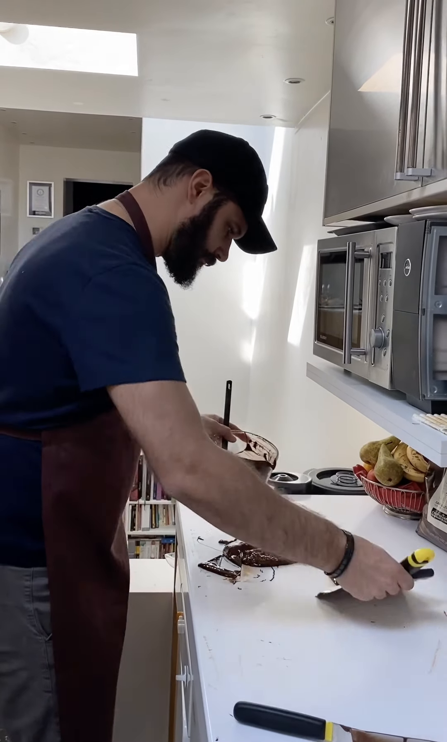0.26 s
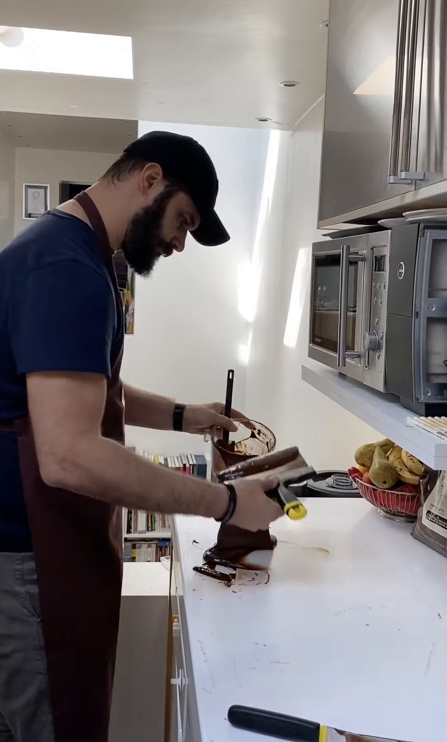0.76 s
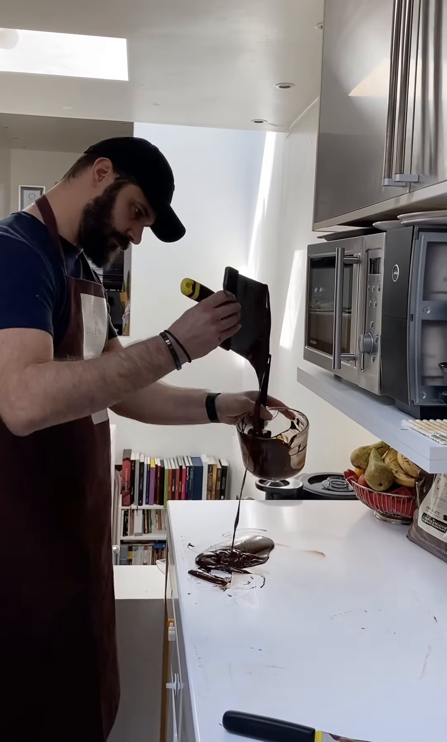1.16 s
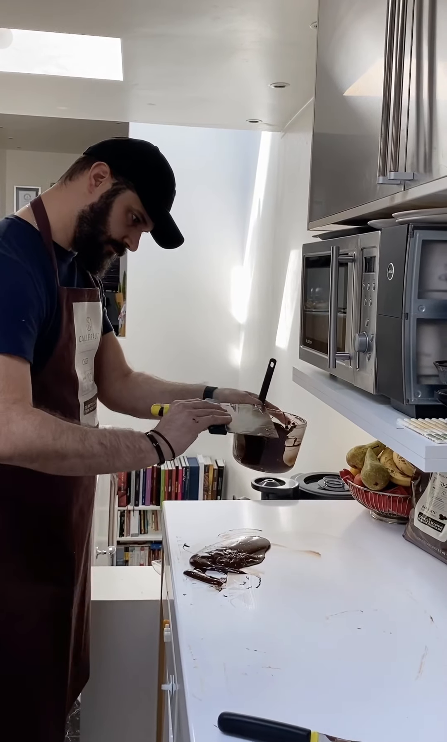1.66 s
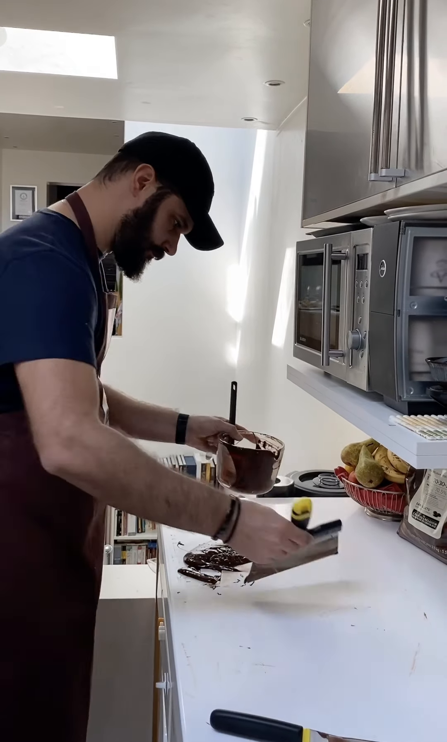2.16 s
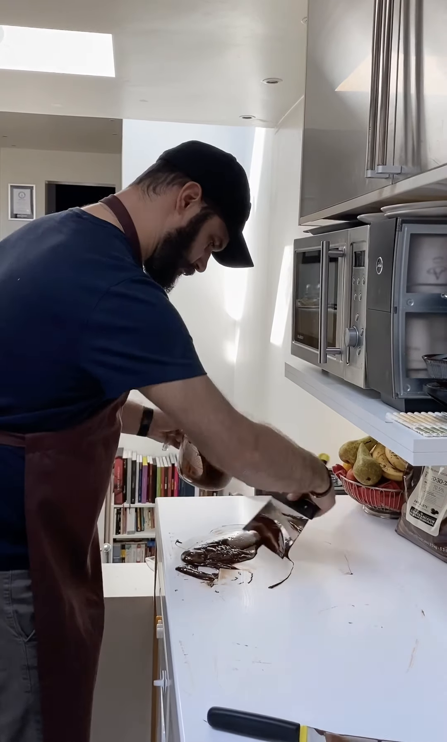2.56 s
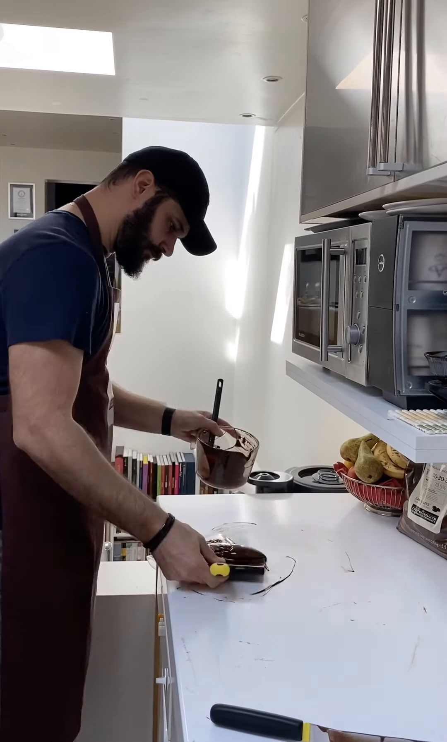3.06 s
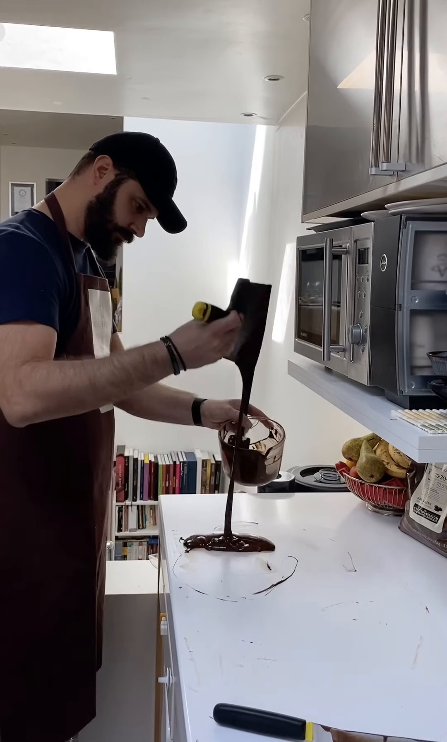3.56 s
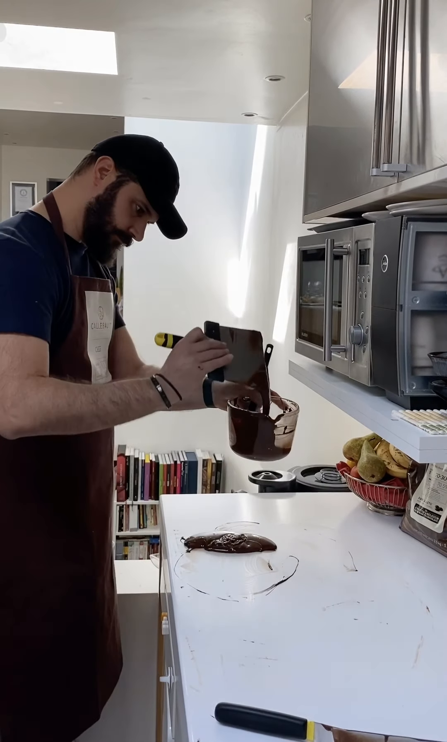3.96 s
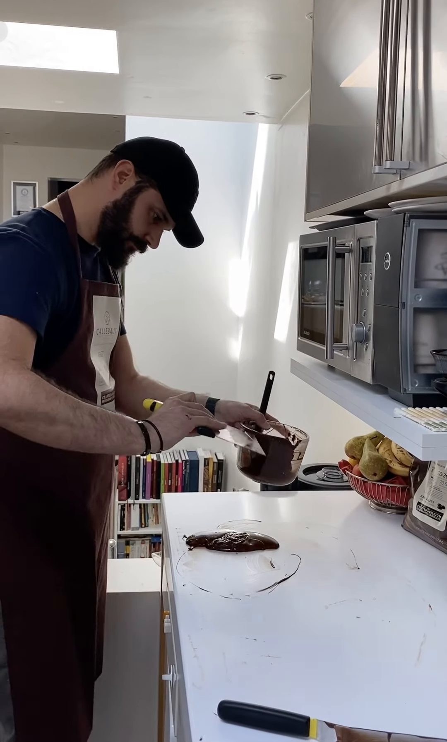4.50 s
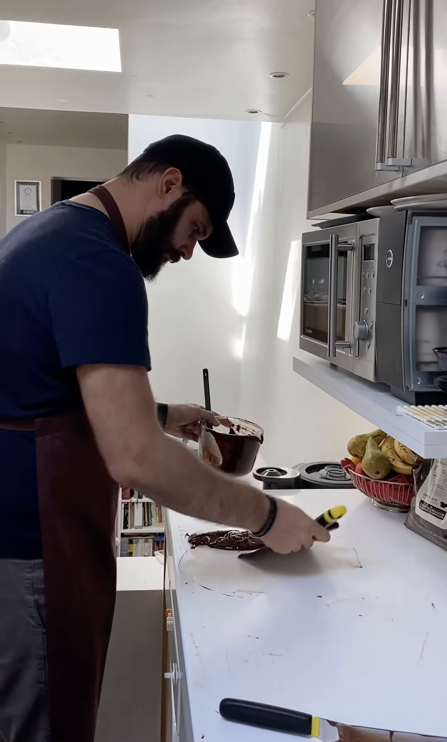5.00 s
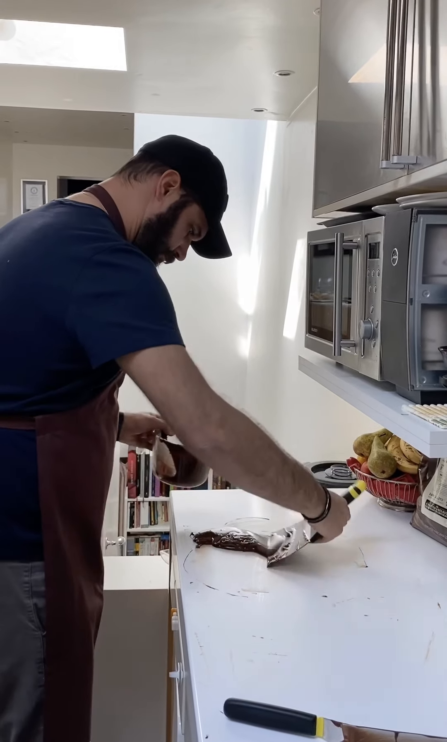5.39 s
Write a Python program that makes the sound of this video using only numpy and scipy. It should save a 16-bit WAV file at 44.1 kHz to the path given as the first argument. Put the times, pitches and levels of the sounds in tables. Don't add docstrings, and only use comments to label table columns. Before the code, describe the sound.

Close stereo sound of chocolate work in a small hard kitchen: one strong blade clack and a firm hissing scrape, a quiet pause with faint taps and a bowl wipe, a softer multiple clack with longer scraping, another pause, a quick ringing wipe, then loud rapid clacks and final short scrapes. Short bright echoes follow the blows; fridges rumble faintly below.

```python
import sys
import numpy as np
from scipy import signal
from scipy.fft import rfft, irfft
from scipy.io import wavfile
from scipy.ndimage import uniform_filter1d

SR = 44100
rng = np.random.default_rng(int(sys.argv[2]) if len(sys.argv) > 2 else 0)


def generate_wav(sig):
    pcm = np.round(np.clip(np.atleast_2d(sig).T, -1, 1) * 32767).astype(np.int16)
    wavfile.write(sys.argv[1], SR, pcm)


def amplitude_ratio(level_db):
    exponent = np.asarray(level_db, float) / 20
    return 10 ** exponent


N = 248724
FIRM_DB = -45


def evened(x):
    return x / np.sqrt(np.mean(x ** 2) + 1e-20)


def slow_noise(window):
    return evened(uniform_filter1d(uniform_filter1d(rng.standard_normal(N), window), window))


def read(points, hz):
    f, value = np.transpose(points)
    return np.interp(np.log(hz + 1), np.log(f + 1), value)


def coloured(x, points):
    hz = np.fft.rfftfreq(x.shape[-1], 1 / SR)
    inside = (hz >= points[0][0]) & (hz <= points[-1][0])
    spectrum = rfft(x) * amplitude_ratio(read(points, hz)) * inside
    return evened(irfft(spectrum, x.shape[-1]))


def resonate(x, hz, width):
    turn = np.exp(2j * np.pi * np.cumsum(hz * np.ones(len(x))) / SR)
    r = np.exp(-np.pi * width / SR)
    return 2 * (turn * signal.lfilter([1 - r], [1, -r], x / turn)).real


def rung(x, peaks, flex):
    grip = uniform_filter1d(uniform_filter1d(rng.standard_normal((len(peaks), N)), 2500), 2500)
    swell_db = 3.7 * evened(grip)
    total = np.zeros(N)
    for (hz, width, db), swell in zip(peaks, swell_db):
        total += amplitude_ratio(db + swell) * evened(resonate(x, hz * flex, width))
    return evened(total)


def struck(modes, t, detune):
    ring = np.zeros(len(t))
    for (hz, db, t60), shift in zip(modes, detune):
        ring += amplitude_ratio(db - 60 * t / t60) * np.sin(2 * np.pi * hz * shift * t)
    return ring / abs(ring).max()


def grit(per_s, spread_db):
    size = amplitude_ratio(spread_db * np.minimum(rng.exponential(1, N), 5))
    return size * rng.standard_normal(N) * (rng.random(N) < per_s / SR)


def ports(a, b, likeness):
    same = np.clip(read(likeness, np.fft.rfftfreq(N, 1 / SR)), 0, 1)
    right = same * rfft(a) + np.sqrt(1 - same ** 2) * rfft(b)
    return np.array([a, irfft(right, N)])


# (time [s], clack level [dB], crack level [dB], counter thud level [dB], crack fall by 60 dB [s])
BLOWS = [(0.0648, -26.5, -51, -31, 0.035), (.1292, 2, -15.5, -30.5, .016), (1.419, -54, -69, -69.5, 0.025),
         (1.4435, -50, -64, -58, 0.026), (2.2457, -25.5, -36.5, -30, 0.025),
         (2.2492, -10, -24, -30.5, 0.01), (2.2526, -10.5, -27, -35, 0.02), (2.2575, -13, -36, -25, 0.011),
         (4.459, -52, -55, -53, .02), (4.7402, -19, -39, -26, 0.11), (4.7684, -2, -21, -25.5, 0.0068),
         (4.7706, -4, -22.5, -34.5, 0.019), (4.7751, -1, -19.5, -30, 0.014)]
# (pitch [Hz], level [dB], fall by 60 dB [s])
CLACK_MODES = [(780, 0.5, 0.026), (879, 10, 0.018), (1030, 3, .018), (1170, 2, 0.033), (1250, -3, .015),
               (1910, -3.5, 0.015), (2010, -2.5, 0.017), (570, -16, 0.03), (798, -22, 0.27),
               (1186, -21, .3), (1910, -21.5, .25), (3740, -27, .25)]
# (pitch [Hz], level [dB], fall by 60 dB [s])
COUNTER_MODES = [(197.6, 5.5, 0.058), (294, -1.5, 0.16), (360, -6, .1), (446.4, -2.5, .12),
                 (600, -4, 0.054)]
# (pitch [Hz], level per Hz [dB])
CRACK_COLOUR = [(1500, -14), (2200, -3), (4000, 0), (5500, -3), (7500, -5.5), (10000, -10), (13000, -13.5),
                (15700, -15), (16300, -39.5)]


def blows():
    out = np.zeros((2, N + SR))
    t = np.arange(SR // 2) / SR
    detune = 1 + 0.011 * rng.standard_normal((len(BLOWS), 12))
    hiss = coloured(rng.standard_normal((2, N + SR)), CRACK_COLOUR)
    hiss[1] = 1.05 * hiss[0] + 0.25 * hiss[1]
    for (s, clack_db, crack_db, thud_db, t60), shift in zip(BLOWS, detune):
        at = slice(round(s * SR), round(s * SR) + len(t))
        clack = amplitude_ratio(clack_db) * struck(CLACK_MODES, t, shift) * np.minimum(t / .0012, 1)
        crack = hiss[:, at] * amplitude_ratio(crack_db + 5.0 - 60 * t / max(t60, .002)) * np.minimum(t / 0.00027, 1)
        thud = amplitude_ratio(thud_db) * struck(COUNTER_MODES, t, shift) * np.minimum(t / .004, 1)
        out[:, at] += clack + crack + thud
    return out[:, :N]


# (time [s], level [dB], pitch [Hz], fall by 60 dB [s])
THUMPS = [(.068, -41, 68, 0.24), (.135, -43, 53.3, 0.73), (.135, -30.5, 162, 0.15),
          (1.443, -57.5, 369, 0.14), (1.443, -56, 654, 0.16), (2.25, -38.5, 60.6, 0.23),
          (2.25, -35.5, 169, 0.19), (2.64, -51, 456, 0.072), (2.75, -48.5, 270, 0.081),
          (2.865, -53, 720, 0.084), (3.07, -42, 52.5, 0.44), (3.08, -50.5, 114, 0.14),
          (4.46, -52, 268.4, .1), (4.528, -50.5, 337, 0.13), (4.54, -54.5, 544, 0.081),
          (4.53, -52, 744, .06), (4.532, -55, 950, .06), (4.555, -46, 200, 0.05), (4.745, -43, 83, 0.36),
          (4.775, -37, 50.6, 0.32), (4.775, -32, 164, 0.22), (5.262, -43, 414, 0.03),
          (5.265, -43.5, 253, 0.059)]


def thumps():
    out = np.zeros((2, N + SR))
    t = np.arange(SR // 2) / SR
    for s, db, hz, t60 in THUMPS:
        pair = [(hz, 0, t60), (1.36 * hz, -9, .5 * t60)]
        start = round(s * SR)
        out[:, start:start + len(t)] += amplitude_ratio(db) * struck(pair, t, [1, 1]) * np.minimum(t * hz, 1)
    return out[:, :N]


def pressure_db(rows):
    t = np.arange(0, N + 64, 64) / SR
    power = amplitude_ratio(2 * -103)
    for s, held, db, rise, fall in rows:
        slope = np.minimum((t - s) / rise, (s + held - t) / fall)
        power = power + amplitude_ratio(2 * (db + 20 * np.minimum(0, slope)))
    return np.interp(np.arange(N) / SR, t, 10 * np.log10(power))


def follows(drag_db, firm_db, slope):
    return amplitude_ratio(firm_db + slope * (drag_db - FIRM_DB))


# (pitch [Hz], level per Hz [dB])
DRAG_COLOUR = [(1500, -32.5), (2400, -5), (3500, -3), (4600, 0.5), (5800, -5.5), (7000, -9), (8500, -21.5)]
# (pitch [Hz], width [Hz], level [dB])
BLADE_MODES = [(2920, 200, -3), (3740, 160, -2.5), (4600, 250, 2.5), (5380, 190, -0.5), (5950, 410, 12.5),
               (7130, 440, -10.5)]


def edge_drag(slips, catches, flex):
    spread = slips + .45 * rng.standard_normal((2, N)) * slips.std()
    return evened(coloured(spread, DRAG_COLOUR) + 0.52 * rung(catches, BLADE_MODES, flex))


# (pitch [Hz], width [Hz], level [dB])
BODY_MODES = [(800, 40, -1.5), (930, 70, -8.5), (1180, 59, -4), (1290, 99, -15.5), (2000, 220, -3.5),
              (2070, 170, 0)]


def scraper_body(low, catches, flex):
    return evened(low + .45 * rung(catches, BODY_MODES, flex))


# (time [s], level [dB], fall by 60 dB [s])
CHATTER = [
    (.066, -38, .15),
    (.135, -25.5, .46),
    (2.26, -36, .38),
    (4.742, -40, .2),
    (4.79, -34, .62),
]
# (pitch [Hz], width [Hz], level [dB])
RATTLE_MODES = [(820, 60, -2), (920, 50, 0), (1090, 50, -2), (1178, 35, 2), (1265, 60, -2), (1370, 60, -5),
                (1845, 60, -6), (1935, 60, -6)]


def chatter(low, catches):
    t = np.arange(N) / SR
    strength, ring = np.zeros(N), np.zeros(N)
    for s, db, t60 in CHATTER:
        strength += (t > s) * amplitude_ratio(db - 60 * abs(t - s) / t60)
    for hz, width, db in RATTLE_MODES:
        ring += amplitude_ratio(db) * evened(resonate(catches, hz, width))
    return strength * evened(low + 1.8 * evened(ring))


# (pitch [Hz], level per Hz [dB])
FIZZ_COLOUR = [(6000, -14.5), (7500, -8.5), (9500, -5.5), (11500, -6), (13500, -5), (15700, -10),
               (15950, -43.5)]


def fizz(slips):
    return coloured(slips + 0.25 * rng.standard_normal((2, N)) * slips.std(), FIZZ_COLOUR)


# (full pressure at [s], held [s], drag level [dB], time to rise 20 dB [s], time to fall 20 dB [s])
SCRAPES = [(.26, .09, -37, .14, .135), (.62, .2, -78, .2, .3), (1.03, .05, -66, .22, .08),
           (1.93, .02, -70, .05, .12), (2.19, .01, -74, .05, .1), (2.27, .1, -43, .03, .45),
           (2.58, .08, -52, .3, .4), (2.8, .08, -57, .4, .15), (2.98, .07, -45, .13, .13),
           (4.1, .18, -70, .12, .12), (4.92, .05, -42.5, .25, .36), (5.31, .04, -51, .1, .2),
           (5.39, .03, -51, .1, .12), (3.35, .05, -76, .15, .2), (1.2, .02, -83, .05, .2)]
# (full pressure at [s], held [s], drag level [dB], time to rise 20 dB [s], time to fall 20 dB [s])
SMEARS = [(.07, .005, -48, .005, .04), (.13, .05, -42, .012, .15), (1.441, .06, -70, .02, .1),
          (1.575, .03, -59, .13, .1), (1.773, .03, -71, .25, .25), (2, .1, -77, .2, .4),
          (3.2, .05, -75, .1, .3), (3.76, .01, -83, .08, .03), (4.175, .01, -57, .15, .09),
          (4.3, .08, -71, .3, .3), (4.53, .03, -67, .2, .25), (4.83, .03, -42, .06, .2),
          (5.5, .02, -60, .1, .1), (5.615, .01, -45, .13, .04)]
# (level at a firm stroke [dB], gain per dB of drag [dB])
RING_LAW = [
    (-56.5, .6),
    (-56.5, .6),
]
# (level at a firm stroke [dB], gain per dB of drag [dB])
FIZZ_LAW = [
    (-45, 1.12),
    (-50, 1.3),
]
# (pitch [Hz], level per Hz [dB])
LOW_COLOUR = [(350, -12.5), (600, -7.5), (1000, 2.5), (1500, -2.5), (2200, -7.5), (3000, -19)]


def strokes():
    t = np.arange(N) / SR
    scrape_db, smear_db = pressure_db(SCRAPES), pressure_db(SMEARS)
    drag_db = 20 * np.log10(np.hypot(amplitude_ratio(scrape_db), amplitude_ratio(smear_db)))
    flex = 1 - .06 * np.minimum(amplitude_ratio(.5 * (drag_db - FIRM_DB)), 1.5)
    flex = flex * (1 + .012 * slow_noise(3000))
    slips, catches = grit(14000, 1.5), grit(6600, 2.0)
    low = coloured(slips, LOW_COLOUR)
    hum_gain = np.hypot(follows(scrape_db, *RING_LAW[0]), follows(smear_db, *RING_LAW[1]))
    fizz_gain = np.hypot(follows(scrape_db, *FIZZ_LAW[0]), follows(smear_db, *FIZZ_LAW[1]))
    layers = amplitude_ratio(drag_db) * edge_drag(slips, catches, flex)
    layers += hum_gain * scraper_body(low, catches, flex)
    layers += chatter(low, catches)
    layers += fizz_gain * fizz(slips)
    return (t > BLOWS[0][0]) * amplitude_ratio(-4.0) * layers


# (time [s], level [dB], rise [s], fall by 60 dB [s])
WIPES = [
    (1.895, -49.5, 0.021, 0.09),
    (4.457, -44, .003, .17),
]
# (pitch [Hz], level per Hz [dB])
SWIPE_COLOUR = [(800, -22), (2200, -10), (3200, -2), (5500, -1), (7500, -3), (10000, -7), (13000, -11),
                (15700, -14)]
# (pitch [Hz], width [Hz], level [dB])
RIM_MODES = [(3120, 100, -17.5), (3600, 90, -40), (4630, 150, 12), (6470, 150, -3), (7600, 240, 16.5),
             (9440, 310, 9.5)]
# (time [s], level [dB], pitch [Hz], length [s], pitch rise [share])
SQUEAKS = [(1.615, -61, 1630, 0.042, 0), (2.283, -35.5, 980, .03, .2), (2.78, -61, 1130, 0.2, .22),
           (5.29, -60, 2000, .07, 0), (4.935, -45, 4280, .06, 0), (4.94, -52.5, 3800, 0.075, 0),
           (5.52, -56, 2000, .22, 0), (5.552, -60, 2687, .16, 0), (5.552, -61.5, 997, .18, 0)]


def wipes():
    t, out = np.arange(N) / SR, np.zeros(N)
    slips = grit(9000, 1.85)
    swipe = evened(coloured(slips, SWIPE_COLOUR) + 0.72 * rung(grit(6000, 2.0), RIM_MODES, 0.96))
    for s, db, rise, t60 in WIPES:
        out += swipe * amplitude_ratio(db + np.minimum(30 * (t - s) / rise, -60 * (t - s) / t60))
    for s, db, hz, length, rise in SQUEAKS:
        done = np.clip((t - s) / length, 0, 1)
        squeak = evened(resonate(slips, hz * (1 + rise * done), 55))
        out += amplitude_ratio(db) * squeak * np.sin(np.pi * done) ** 2
    return out


# (pitch [Hz], fall by 60 dB [s])
ROOM_DECAY = [(100, .45), (400, .45), (1000, 0.14), (2800, 0.38), (7000, 0.19), (14000, 0.17)]
# (delay [s], level [dB])
EARLY = [(.0035, -21.5), (.0065, -9), (.0098, -11), (.0135, -13.5), (.0172, -10.5), (.0215, -8),
         (.0265, -17)]
# (pitch [Hz], likeness [0-1, clipped])
ROOM_LIKENESS = [(100, 4.33), (270, .95), (500, 0.6), (1000, 0.2), (2500, 0), (5000, -0.44), (9000, 0.36),
                 (14000, 1)]


def room(x):
    taps = np.zeros((2, SR))
    at = np.arange(500, SR - 20, 20) + rng.integers(0, 20, (2, (SR - 501) // 20))
    np.put_along_axis(taps, at, rng.choice([-1., 1.], at.shape), 1)
    hz, t, z = signal.stft(taps, SR, nperseg=256)
    decay = amplitude_ratio(-60 * t / read(ROOM_DECAY, hz)[:, None])
    tail = signal.istft(z * decay, SR, nperseg=256)[1]
    tail *= np.minimum(np.arange(tail.shape[1]) / SR / 0.014, 1)
    tail = amplitude_ratio(-6.5) * tail / np.linalg.norm(tail[0])
    for k, (s, db) in enumerate(EARLY):
        arrival = round(s * SR) + 9 * (k % 3) * np.arange(2)
        tail[[0, 1], arrival] += (-1) ** k * amplitude_ratio(db) / 2
    return ports(*signal.fftconvolve(x[None], tail, axes=1)[:, :N], ROOM_LIKENESS)


# (pitch [Hz], level per Hz [dB])
AIR_COLOUR = [(65, -17), (110, -9), (124, -11.5), (181, -4.5), (270, -5), (411, -11), (473, -14.5),
              (650, -17), (704, -12.5), (763, -18.5), (950, -18), (1630, -28), (2200, -19.5), (4600, -34.5),
              (13000, -50.5)]
# (pitch [Hz], level per Hz [dB])
RUMBLE_COLOUR = [(13, -56.5), (22, -21), (25, -32.5), (32, -8.5), (84, 0.5), (101, -0.5), (110, -28),
                 (114, -28.5), (130, -38.5), (170, -61), (290, -120)]
# (pitch [Hz], likeness [0-1])
FAR_LIKENESS = [(100, 0.74), (160, .9), (270, 0.57), (450, .35), (800, 0.036), (2500, .2), (6000, 0.14),
                (12000, .7)]


def kitchen():
    air = ports(*coloured(rng.standard_normal((2, N)), AIR_COLOUR), FAR_LIKENESS)
    lumps_db = 1.6 * slow_noise(2500)
    rumble = evened(coloured(rng.standard_normal(N), RUMBLE_COLOUR) * amplitude_ratio(lumps_db))
    return amplitude_ratio(-66.5) * air + amplitude_ratio(-60) * rumble


def scene():
    work = blows() + thumps() + strokes() + wipes()
    return work + room(work.mean(0)) + kitchen()


def roll_off(x):
    return signal.sosfilt(signal.butter(12, 16610, fs=SR, output="sos"), x)


# (pitch [Hz], phase [radians])
LEAD = [(0, 0), (690, -0.3), (1640, 0.1), (2070, 0.6), (2500, 2.4), (3960, 0.9), (4310, 3.4), (4910, 3.6),
        (5170, 4.3), (5680, 7.0), (8010, 7.9), (10900, 8.6), (12600, 9.4), (16200, 9.5)]
# (pitch [Hz], level [dB])
TILT = [(60, 0.0), (130, 0.5), (290, 1.0), (640, 2.5), (1410, 2.0), (3100, -1.5), (6820, -0.5),
        (15000, 0.0)]
# (pitch [Hz], level [dB])
BASS = [(20, -42.5), (28, -15.5), (36, -2), (46, 3.5)]


def record(dry):
    hz = np.fft.rfftfreq(N, 1 / SR)
    half = amplitude_ratio(read(TILT, hz) / 2)
    lag = np.exp(-1j * np.interp(hz, *np.transpose(LEAD)))
    heard = rfft(dry) * np.array([half, lag / half]) * amplitude_ratio(read(BASS, hz))
    x = 1.2 * np.tanh(irfft(heard, N) / 1.2)
    return roll_off(x)


dry = scene()
out = record(dry)
generate_wav(out)
```